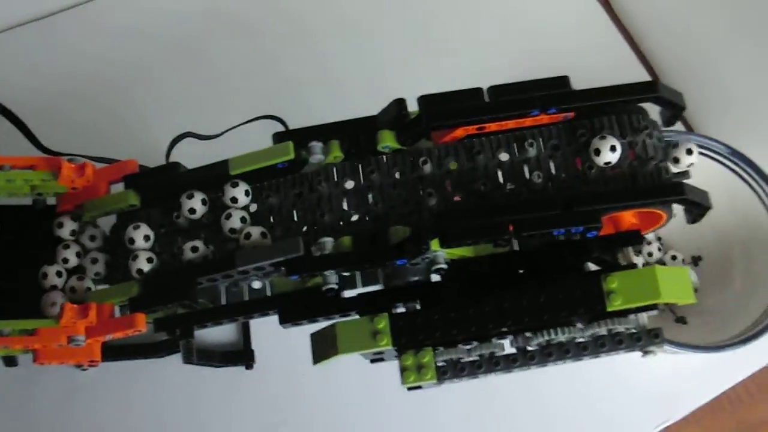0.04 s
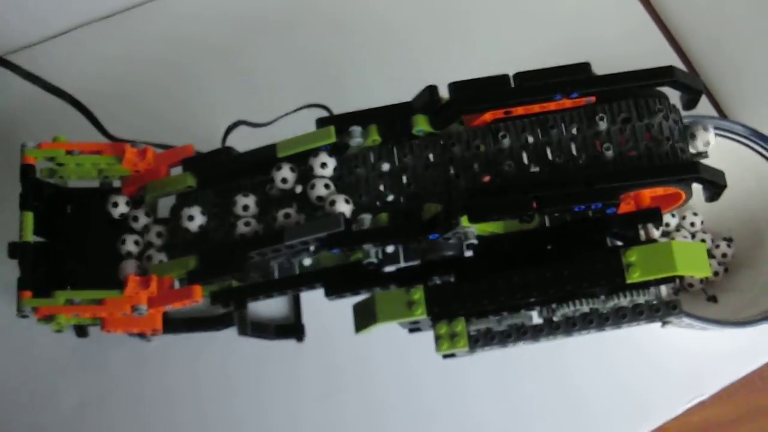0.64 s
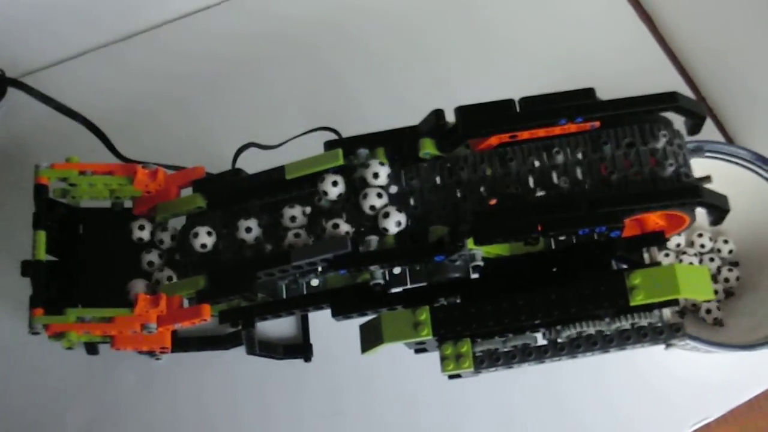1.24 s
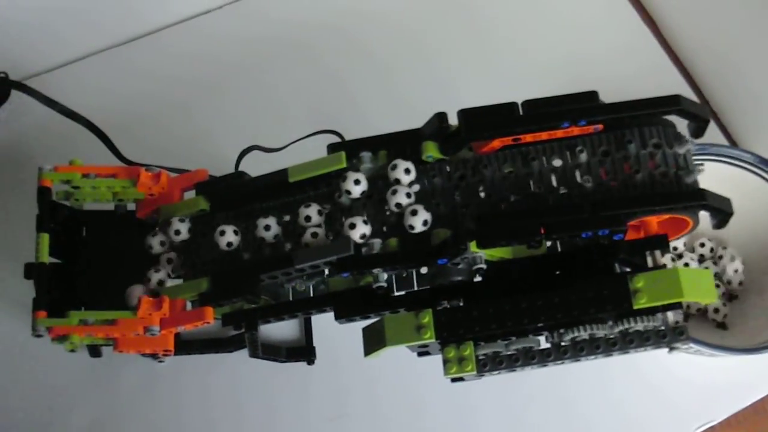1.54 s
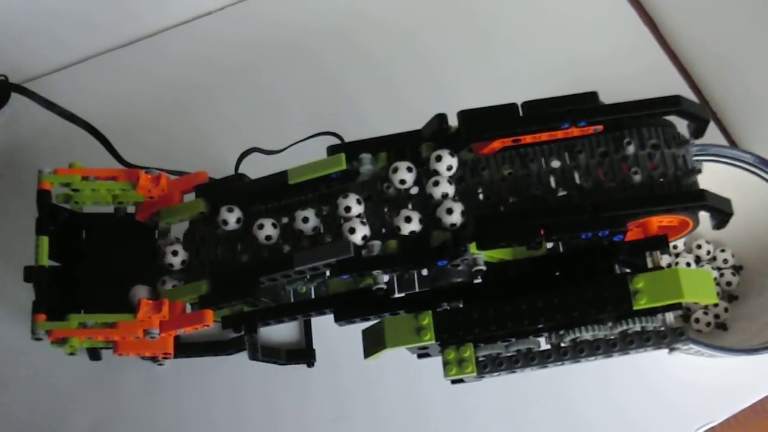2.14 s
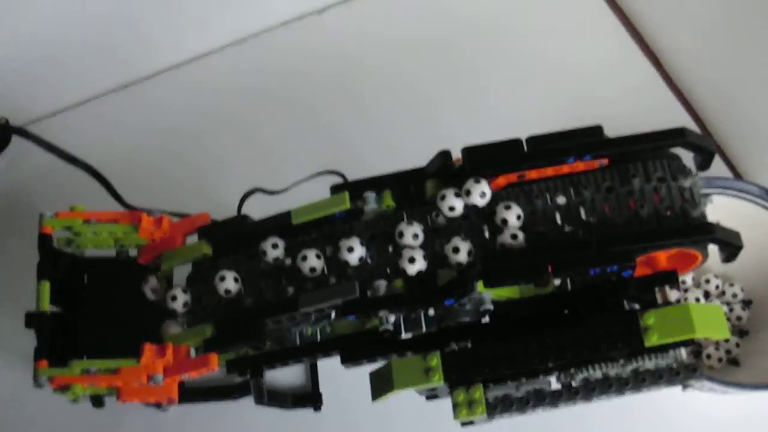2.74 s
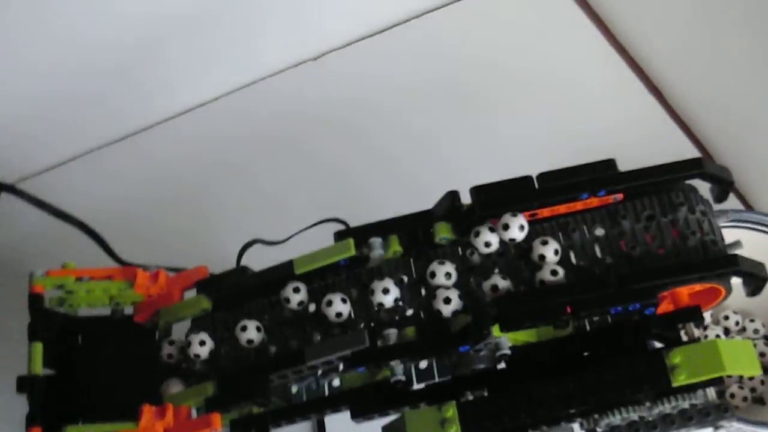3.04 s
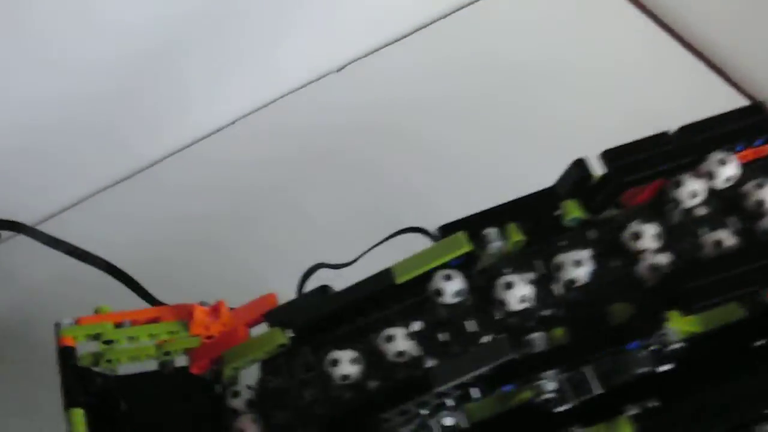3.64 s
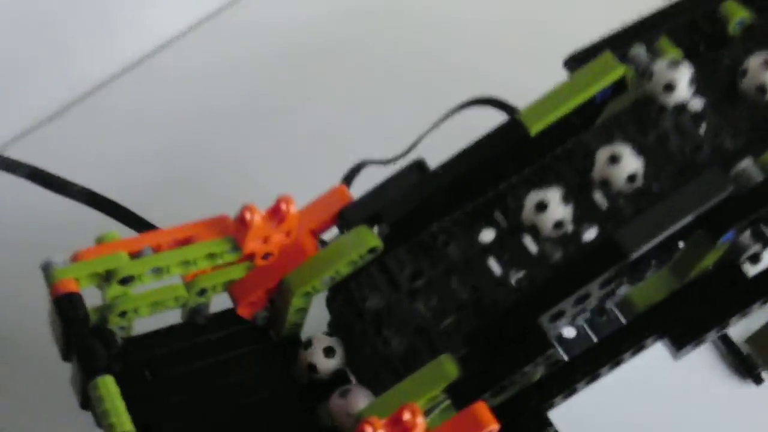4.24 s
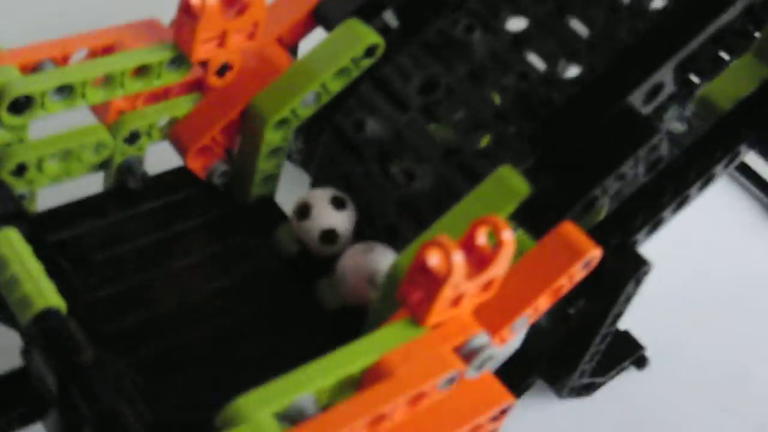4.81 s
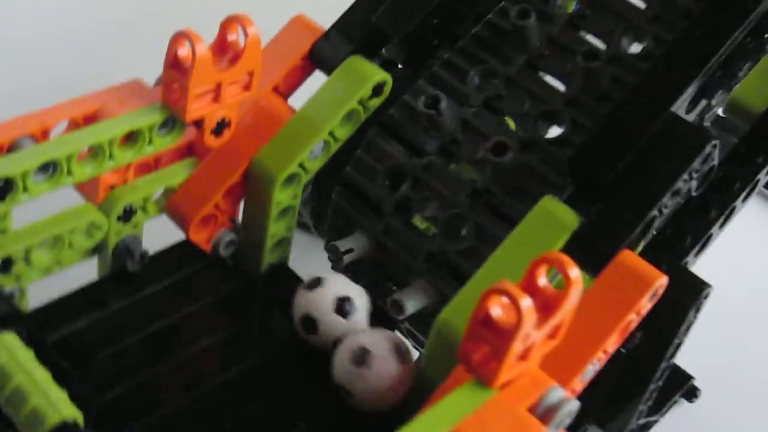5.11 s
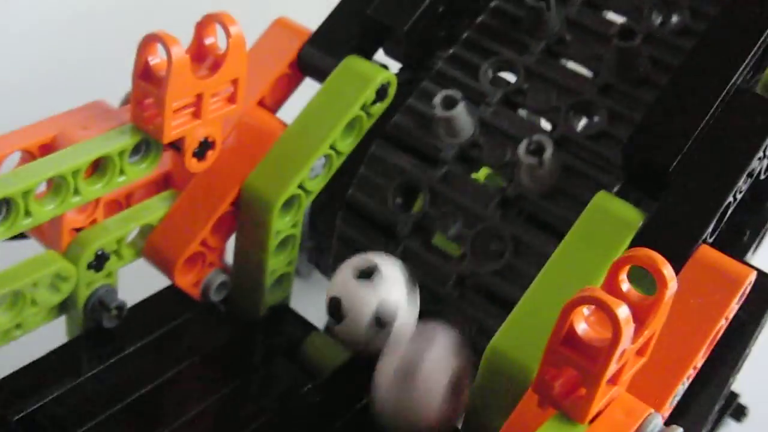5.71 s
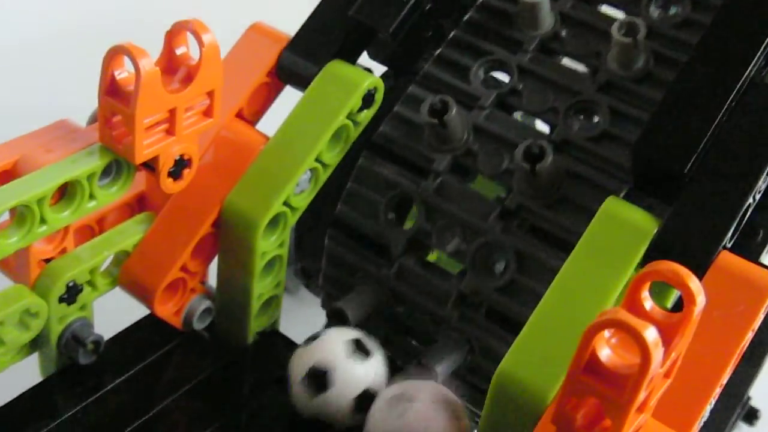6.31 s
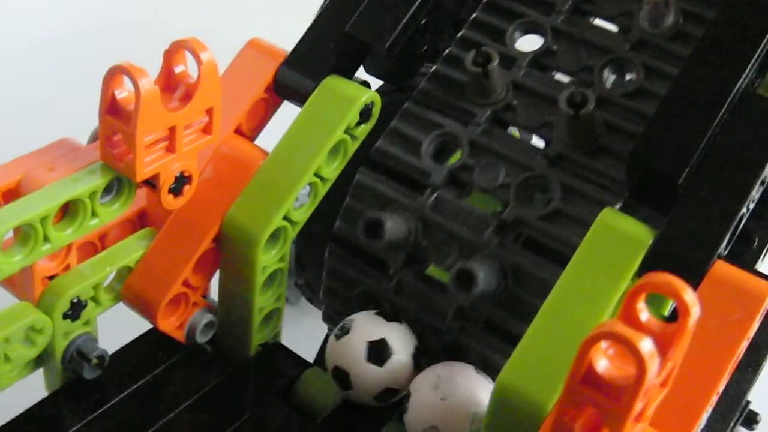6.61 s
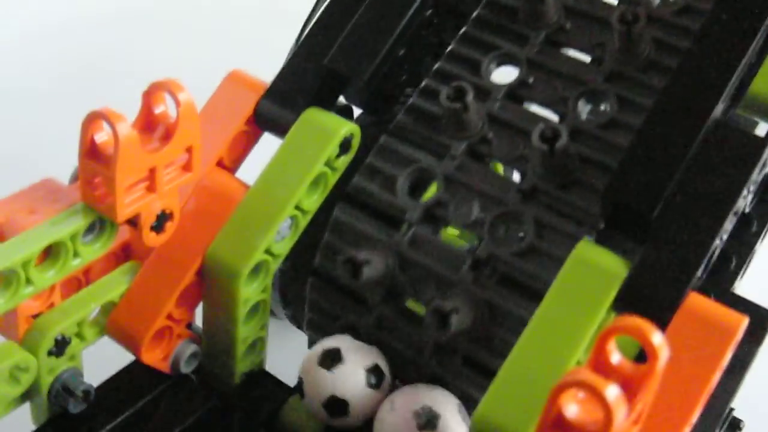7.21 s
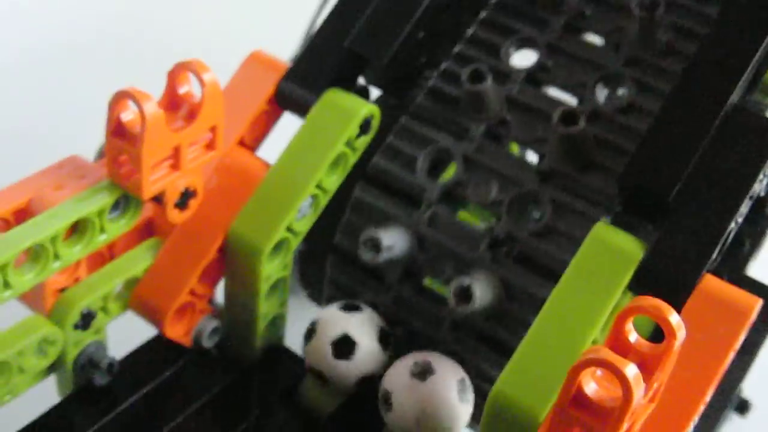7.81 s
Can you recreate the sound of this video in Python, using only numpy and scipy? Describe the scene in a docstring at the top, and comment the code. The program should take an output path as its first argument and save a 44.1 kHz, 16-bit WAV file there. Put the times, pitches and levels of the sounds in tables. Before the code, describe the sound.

A motor-driven plastic toy conveyor runs throughout on a table in a small room, with a grainy, slightly throbbing gear whirr and a faint motor whine. At first it sounds quiet and distant. During the first second and a half, several small hollow plastic balls drop into a bowl with bright clicks, bouncing quickly to rest among other balls. The drops then pause. From about 2.5 seconds the microphone moves in and the whirr swells, reaching its fullest around five seconds, while balls occasionally knock against the belt and plastic frame. From about 5.3 seconds until the end, near eight seconds, ball after ball clacks down close up, bouncing, rattling the heap and pinging briefly off the bowl's wall. These landings have more body, with the table booming softly beneath them as the machine keeps whirring.

```python
"""A motor-driven toy conveyor of plastic bricks carries small hollow balls up a belt on a table indoors.
At first the gears whirr and the motor whines from afar, while a few balls drop off the top into a bowl.
From about 2.5 s the microphone moves in: the machine swells and balls knock against the belt.
From about 5 s, close up, ball after ball clacks into the bowl, bounces on the others and pings the wall,
with the table booming softly underneath."""
import sys
import numpy as np
from scipy import signal
from scipy.fft import rfft, irfft, next_fast_len
from scipy.io import wavfile

SR = 44100
rng = np.random.default_rng(int(sys.argv[2]) if len(sys.argv) > 2 else 0)


def bounce(signal):
    """Save signal as a 16-bit WAV file at the path given by the first command-line argument."""
    frames = np.transpose(np.atleast_2d(signal))
    limited = np.clip(frames, -1, 1)
    pcm = np.round(limited * 32767).astype(np.int16)
    wavfile.write(sys.argv[1], SR, pcm)


N = 351036
TIME = np.arange(N) / SR
AGE = TIME[:SR // 4]   # seconds since a hit


# hard landings on the heap: (t/s, shell level/dB, relative thud level/dB)
LANDINGS = [(0.0187, -14, -39.5), (0.1865, -32, -48), (0.6641, -15.5, -43), (0.685, -21, -45),
            (0.7465, -25, -57), (0.802, -28, -58), (0.811, -22.5, -44.5), (0.8945, -24, -52),
            (1.2806, -15, -46), (1.2871, -13.5, -41), (1.3568, -25.5, -47), (5.2672, -13.5, -19),
            (5.4143, -14.5, -27), (5.4494, -24, -31), (5.5499, -25, -32), (5.6093, -21, -29),
            (5.6144, -13, -24), (5.6341, -18, -32), (5.758, -17, -28.5), (5.8629, -14, -21.5),
            (5.943, -18.5, -30), (5.986, -14.5, -31), (6.2056, -17.5, -33), (6.4319, -14.5, -19.5),
            (6.5928, -25, -29), (6.747, -13.5, -24.5), (7.0624, -23, -36), (7.1231, -24.5, -36.5),
            (7.4632, -14, -21.5), (7.5692, -19, -32.5), (7.5854, -22, -32.5)]
# bounces to rest: (t/s, first level/dB, first flight/s, share of flight kept per bounce)
BOUNCE_RUNS = [(0.2203, -24, .0695, .785), (0.9594, -26.5, .0625, .775), (1.434, -21.5, .066, .795),
               (5.333, -28, .048, .8), (5.688, -24.5, .069, .88), (5.9585, -13.5, .074, .85),
               (6.1086, -15.5, .087, .79), (6.492, -22.5, .058, .8), (6.886, -19.5, .082, .835),
               (7.6422, -20.5, .067, .82)]

def falling_balls(close):
    """Balls land, bounce to rest and glance off the bowl; returns a clack layer and a thud layer."""
    rest_flight_s = .027   # at a flight this short the ball lies still
    light = [(s, db) for run in BOUNCE_RUNS for s, db, flight_s in rebounds(*run, loss_db=3, count=7)
             if flight_s > rest_flight_s and s < TIME[-1]]
    light += [(s, -15.5 + .25 * low_db) for s, low_db, _ in WALL_HITS]   # glances
    weight_db = -22.5 + 12 * close   # light touches gain body close up
    touches = list(LANDINGS) + [(s, db, db + weight_db[int(s * SR)]) for s, db in light]
    clacks, thuds = np.zeros((2, N))
    for s, shell_db, thud_db in touches:
        add(clacks, s, from_db(shell_db) * shell_clack(shell_db, fullness(s)))
        add(thuds, s, from_db(thud_db + 4.5) * heap_thud())
    return clacks, thuds


def rebounds(s, db, flight_s, kept, loss_db, count):
    """Each bounce comes sooner and softer: yields (t/s, level/dB, flight before it/s)."""
    for k in range(count):
        yield s, db - loss_db * k, flight_s / kept
        s, flight_s = s + flight_s, flight_s * kept


# bright ring of a shell, and its faint after-ring: (f/Hz, relative level/dB, t60/s)
SHELL_MODES = [(7740, -6.5, 0.068), (7880, -12, 0.056), (8440, 4, 0.042), (8284, 2.5, 0.051),
               (8750, -4, .02), (9270, 4, 0.017), (9350, -0.5, 0.053), (9630, -10, 0.024),
               (10020, -4, 0.051), (10300, -26, 0.016), (10630, -19, 0.062), (11700, -15, .04),
               (12470, -9, 0.051), (12000, -30, 0.024), (12180, -5.5, 0.024), (12320, -13.5, .035),
               (13800, -25, 0.034)]
AFTER_RING_MODES = [(8200, -7, 0.24), (8300, 0, 0.22), (9200, -20, .21), (9920, -1, 0.082)]
# ball-on-ball crack, and the tick at its front: (f/Hz, relative level/dB)
CLACK_EQ = [(80, -16), (400, -14), (1000, -15), (2300, 1.5), (4000, -10), (6500, -4), (8000, 8.5),
            (9200, 5.5), (10500, 5), (12500, -40), (15500, -9)]
TICK_EQ = [(100, -20), (600, -18), (1500, -15), (5000, -6), (9000, 1), (13000, -2), (15500, -1.5)]

def shell_clack(level_db, fill):
    """A hollow shell rings high and briefly; harder contacts are shorter and so brighter."""
    force_db = level_db + 18   # above a firm hit at -18 dB
    tilt_db_per_octave = 1.3 * force_db
    modes = [(hz, db + tilt_db_per_octave * np.log2(hz / SHELL_MODES[0][0]), t60)
             for hz, db, t60 in SHELL_MODES]
    shell = ring(modes, uneven_db=4.5, detune=.0041)
    shell += from_db(-6.5) * crack(CLACK_EQ, t60=.019, tail_db=-26, tail_t60=.078)
    shell += from_db(-19.5 + 9.6 * fill) * ring(AFTER_RING_MODES, uneven_db=2.5, detune=.00304)
    tick = from_db(-10.5 + .45 * force_db) * crack(TICK_EQ, t60=.0067, tail_db=-27, tail_t60=.04)
    attack = 1 - np.exp(-AGE / .00042)
    return unit_attack(shell * attack + tick)


# body under a landing: (f/Hz, relative level/dB, t60/s)
THUD_MODES = [(710, -12, 0.027), (1107, -5.5, 0.081), (1204, -0.5, 0.025), (1360, -2, 0.024),
              (1586, -1.5, 0.023), (1960, 2, 0.012)]
# dry plastic snap of thuds and knocks: (f/Hz, relative level/dB)
SNAP_EQ = [(80, -15), (400, -34), (700, -6), (1100, -14), (1600, 2), (4200, 1.5), (7000, -1.5), (10000, -9),
           (12800, -7), (15500, -26)]

def heap_thud():
    """What lies under a landing ball answers with a short midrange thud."""
    body = ring(THUD_MODES, uneven_db=1, detune=.007)
    snap = crack(SNAP_EQ, t60=.01, tail_db=-29, tail_t60=.06)
    return unit_attack(body + from_db(-.5) * snap)


# knocks on belt and frame, mostly as a row of pins comes round: (t/s, relative level/dB)
BELT_HITS = [(0.3633, -39.5), (2.529, -33), (3.1723, -27.5), (3.233, -27.5), (3.2726, -32), (3.798, -23.5),
             (3.8605, -22), (4.4325, -18.5), (5.0029, -19), (5.7137, -20.5), (5.7404, -22), (6.277, -21),
             (6.2993, -21), (6.8663, -25), (7.4347, -28.5)]
# hollow tone of the plastic frame: (f/Hz, relative level/dB, t60/s)
FRAME_MODES = [(690, -9.5, 0.047), (1680, 1.5, 0.052), (1847, -1.5, 0.057), (2140, 4, 0.016),
               (2590, 7, 0.0079), (3380, -2.5, 0.015), (4060, 6.5, 0.012)]

def belt_knocks():
    """A ball snaps against the frame and hops twice, each hop softer, with more ring against its snap."""
    out = np.zeros(N)
    for hit in BELT_HITS:
        for hop, (s, db, _) in enumerate(rebounds(*hit, flight_s=.0305, kept=.68, loss_db=9, count=3)):
            snap = crack(SNAP_EQ, t60=.021, tail_db=-33, tail_t60=.034)
            frame = from_db(-4 + 5 * hop) * ring(FRAME_MODES, uneven_db=2.5, detune=.02)
            add(out, s, from_db(db + 2.03) * unit_attack(snap + frame))
    return out


# hits on the bowl's wall: (t/s, relative low ring level/dB, relative high ring level/dB)
WALL_HITS = [(0.1427, -44.5, -39), (0.7607, -52, -45.5), (1.4083, -41, -35.5), (5.4502, -37.5, -52),
             (5.9428, -26, -26), (6.013, -31, -37), (6.0535, -27.5, -32.5), (6.5497, -25, -28.5),
             (6.869, -34.5, -42), (7.5105, -27.5, -32.5), (7.69, -35, -49)]
# the bowl's low tone and its sparkle: (f/Hz, relative level/dB, t60/s)
BOWL_LOW_MODES = [(853, -17, 0.28), (2107, 1, 0.15)]
BOWL_HIGH_MODES = [(3735, 3.5, 0.066), (5746, 4.5, 0.031), (7930, -3, 0.035), (10800, -4.5, 0.023),
                   (12000, 0.5, 0.038), (12600, 1, .03)]

def bowl_pings():
    """The struck wall rings at its own pitches, the low ones hanging on longest."""
    out = np.zeros(N)
    for s, low_db, high_db in WALL_HITS:
        add(out, s, from_db(low_db + 3) * ring(BOWL_LOW_MODES, uneven_db=3.5, detune=.0013))
        add(out, s, from_db(high_db + 11) * ring(BOWL_HIGH_MODES, uneven_db=3.5, detune=.0006))
    return out


def jostle(hits, modes, per_s, settle_s, gain_db):
    """Landings stir four balls in the heap: faint random touches die away as they settle."""
    out = np.zeros(N)
    for _ in range(4):
        touches = (rng.random(N) < per_s / SR) * rng.standard_normal(N)
        out += signal.oaconvolve(touches, ring(modes, uneven_db=5, detune=.011))[:N]
    return from_db(gain_db) * follow_level(hits, settle_s) * unit_rms(out)


def fullness(s):
    """The bowl fills steadily, 0-1: a fuller heap has more neighbours to ring along and jostle."""
    return s / TIME[-1]


# the move in towards the gears: (t/s, gear level/dB, closeness 0-1)
MIC_MOVE = [(0, -45, 0.02), (.55, -45.5, 0), (1.2, -43.5, 0.14), (1.8, -42, 0.2), (2.4, -40, 0.2),
            (3.0, -37.5, 0.71), (3.5, -34.5, 0.85), (4.1, -32.5, 0.84), (4.8, -32, 1), (5.2, -31.5, 1),
            (6.4, -34, 0.96), (7.3, -34.5, 0.97), (7.96, -33, 0.89)]
# whirr from afar and close up: (f/Hz, relative level/dB)
FAR_WHIRR_EQ = [(290, -51), (500, -27), (805, -13.5), (841, -13), (972, -14.5), (1160, -16), (1420, -7),
                (1540, -14.5), (2210, -10.5), (2790, -0.5), (3470, -6.5), (7240, -4.5), (8010, -8),
                (11800, -7), (15800, -13.5)]
NEAR_WHIRR_EQ = [(290, -40), (500, -18.5), (817, -9.5), (891, -10.5), (944, -4), (1040, -6.5), (1420, -7),
                 (1520, -6.5), (2790, -0.5), (3320, -1.5), (4300, 0), (6740, -2.5), (7900, -5),
                 (12400, -4.5), (15800, -11.5)]
# resonant peaks in the whirr, and a narrow dip near 7.9 kHz: (f/Hz, width/Hz, gain/dB)
WHIRR_BANDS = [(2730, 26, 7), (2860, 110, 1), (3160, 100, -1), (3330, 100, 1.5), (4110, 200, 2.5),
               (5900, 350, 2), (7130, 390, 3.5), (7870, 130, -12), (12200, 650, 2.5)]
# tremolo from wheels and belt links: (rate/Hz, depth)
GEAR_THROBS = [(1.6, 0.024), (6.5, 0.1), (19.5, 0.067), (32.3, 0.11), (77, .04)]

def gear_whirr(level_db, close):
    """Countless tooth contacts excite the gearbox, throbbing as wheels and belt links come round."""
    teeth = rng.standard_normal(N) * from_db(2 * drift(1500))   # grainy noise
    far = coloured(teeth, FAR_WHIRR_EQ, WHIRR_BANDS)
    near = coloured(teeth, NEAR_WHIRR_EQ, WHIRR_BANDS)
    wobbly_s = TIME + .0028 * drift(1.4)
    throb = 1 + sum(depth * np.sin(2 * np.pi * (hz * wobbly_s + rng.random()))
                    for hz, depth in GEAR_THROBS)
    gain = from_db(level_db + .5 * drift(40))
    return gain * throb * shifting_echoes(far + close * (near - far), wet=.47, t60=.035)


# partials of the whine: (multiple of the turning rate, far level/dB, near level/dB)
MOTOR_PARTIALS = [(3, -79, -70.5), (5, -79, -64), (6, -74, -54), (9, -62.5, -56.5), (12, -68, -56.5),
                  (15, -68, -56.5)]

def motor_whine(close, turning_hz=159.2):
    """The motor sings on multiples of its turning rate, wavering a little with the load."""
    turns = np.cumsum(turning_hz * (1 + .00123 * drift(14))) / SR
    out = np.zeros(N)
    for multiple, far_db, near_db in MOTOR_PARTIALS:
        level_db = far_db + close ** 2 * (near_db - far_db) + 3.3 * drift(12)
        out += from_db(level_db) * np.sqrt(2) * np.sin(2 * np.pi * multiple * turns)
    return out


# low end under the landings: (f/Hz, relative level/dB)
BOOM_EQ = [(30, -27), (65, -28), (100, 6.5), (140, -2.5), (200, -7.5), (350, -26), (700, -44)]

def table_boom(thuds):
    """The table booms under each thud and dies away."""
    return from_db(-24) * follow_level(thuds, settle_s=.18) * coloured(rng.standard_normal(N), BOOM_EQ)


# low bed under the machine: (f/Hz, relative level/dB)
DRONE_EQ = [(12, -38), (22, -1.5), (65, -3.5), (95, 0), (180, -6.5), (312, -3), (400, -6.5), (600, -9),
            (800, -27), (1300, -80)]

def table_drone(close):
    """The running machine keeps the table droning, louder close up."""
    return (from_db(-66.5) + close * from_db(-58.5)) * coloured(rng.standard_normal(N), DRONE_EQ)


def shifting_echoes(x, wet, t60, combs=12):
    """Short echoes comb the whirr; its colour drifts steadily over time."""
    morph = np.linspace(0, combs - 1, N)
    age = AGE[:1024]
    out = np.zeros(N)
    for k in range(combs):
        paths = rng.standard_normal(len(age)) * from_db(-60 * age / t60)
        paths = wet * paths / np.linalg.norm(paths)
        paths[0] = 1   # the direct sound
        crossfade = np.maximum(1 - abs(morph - k), 0)
        out += crossfade * signal.oaconvolve(x, paths)[:N]
    return unit_rms(out)


def room(x, early_db, early_t60, late_db, late_t60):
    """Quick reflections from table and wall, then the faint tail of a small room."""
    age = TIME[:SR // 2]
    early, late = rng.standard_normal((2, len(age))) * (age > .002)
    early = from_db(early_db) * unit_rms(early * from_db(-60 * age / early_t60))
    late = from_db(late_db) * unit_rms(late * from_db(-60 * age / late_t60))
    return x + signal.fftconvolve(x, (early + late) / np.sqrt(len(age)))[:N]


def ring(modes, uneven_db, detune):
    """One hit on a body: decaying modes, each with a random strength and slight mistuning."""
    hz, db, t60 = np.transpose(modes)[:, :, None]
    strength, tuning, phase = rng.standard_normal((3, len(modes), 1))
    waves = np.sin(2 * np.pi * (hz * (1 + detune * tuning) * AGE + phase))
    envelopes = from_db(db + uneven_db * strength - 60 * AGE / t60)
    return unit_attack(np.sum(envelopes * waves, axis=0))


def crack(eq, t60, tail_db, tail_t60):
    """The noise burst of a contact, with a tail of scatter from nearby parts."""
    fade = from_db(-60 * AGE / t60) + from_db(tail_db - 60 * AGE / tail_t60)
    return unit_attack(coloured(rng.standard_normal(len(AGE)), eq) * fade)


def coloured(x, eq, bands=()):
    """A sound through an EQ curve and bell bands, at rms 1."""
    size = next_fast_len(len(x))
    hz = np.arange(size // 2 + 1) * SR / size + 1e-3
    eq_hz, eq_db = np.transpose(eq)
    db = np.interp(np.log(hz), np.log(eq_hz), eq_db)
    for centre, width, lift in bands:
        db += lift / (1 + (2 * (hz - centre) / width) ** 2)
    return unit_rms(irfft(rfft(x, size) * from_db(db), size)[:len(x)])


def follow_level(hits, settle_s):
    """Envelope follower: the strength of recent hits, leaking away."""
    keep = np.exp(-1 / (settle_s * SR))
    return np.sqrt(signal.lfilter([1 - keep], [1, -keep], hits ** 2 + 1e-18))


def drift(per_s):
    """Random modulation gliding between values, at rms 1."""
    knots = rng.standard_normal(int(TIME[-1] * per_s) + 2)
    return unit_rms(np.interp(TIME * per_s, np.arange(len(knots)), knots))


def add(out, s, sound):
    """Mix a sound in at s seconds."""
    start = max(round(s * SR), 0)
    out[start:start + len(sound)] += sound[:N - start]


def from_db(db):
    """Gain of a level in dB."""
    return 10 ** (np.asarray(db) / 20)


def unit_rms(x):
    """The same sound at rms 1."""
    return x / np.sqrt(np.mean(x ** 2) + 1e-20)


def unit_attack(x):
    """The same hit with rms 1 over its first 6 ms."""
    return x / np.sqrt(np.mean(x[AGE < .006] ** 2) + 1e-20)


def scene():
    """Balls up front in a small room, gears and motor behind, the table underneath; mono."""
    move_s, gear_db, closeness = np.transpose(MIC_MOVE)
    close = np.interp(TIME, move_s, closeness)
    clacks, thuds = falling_balls(close)
    rattle = jostle(clacks, SHELL_MODES, per_s=44, settle_s=.072, gain_db=-18.5)
    rattle *= from_db(10 * fullness(TIME))
    clatter = jostle(thuds, THUD_MODES, per_s=70, settle_s=.17, gain_db=-6.5)
    boom = table_boom(thuds)
    balls = clacks + thuds + rattle + clatter + belt_knocks() + bowl_pings()
    machine = table_drone(close) + gear_whirr(np.interp(TIME, move_s, gear_db), close) + motor_whine(close)
    balls = room(balls, early_db=-17.5, early_t60=.04, late_db=-15.5, late_t60=.29)
    return (balls + machine + boom)[None]


def record(dry):
    """Soft clipping rounds the tallest peaks; a steep low-pass takes off the air."""
    ceiling, cutoff_hz = .85, 15720
    rounded = ceiling * np.tanh(dry / ceiling)
    return signal.sosfilt(signal.ellip(12, .1, 70, cutoff_hz, fs=SR, output="sos"), rounded)


dry = scene()
out = record(dry)
bounce(out)
```